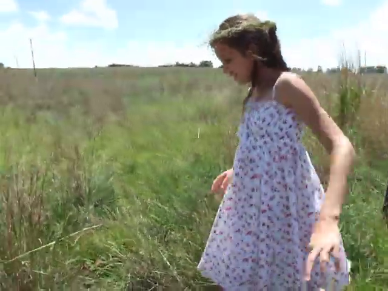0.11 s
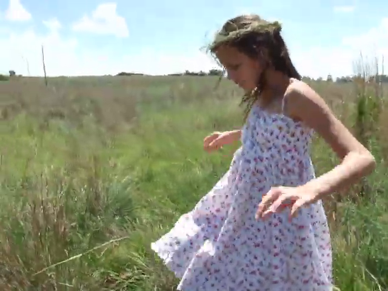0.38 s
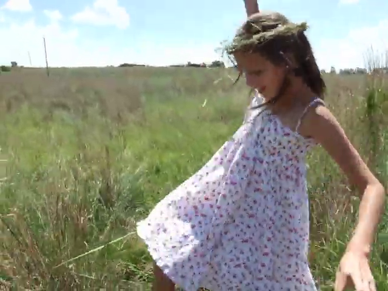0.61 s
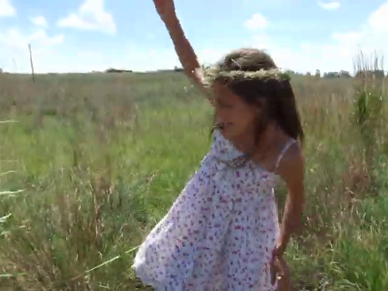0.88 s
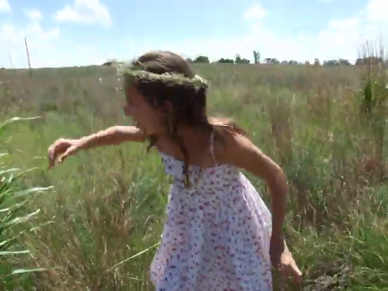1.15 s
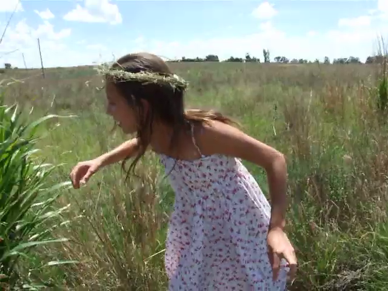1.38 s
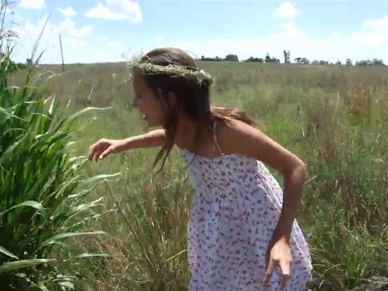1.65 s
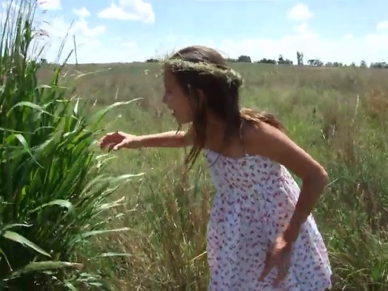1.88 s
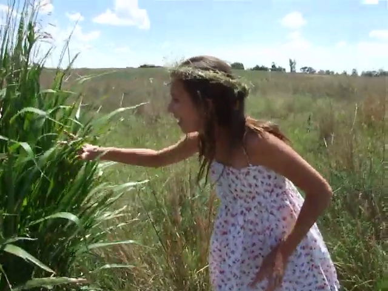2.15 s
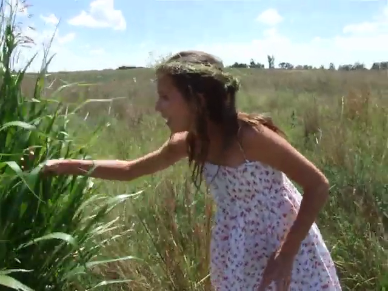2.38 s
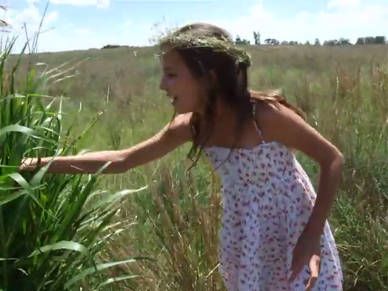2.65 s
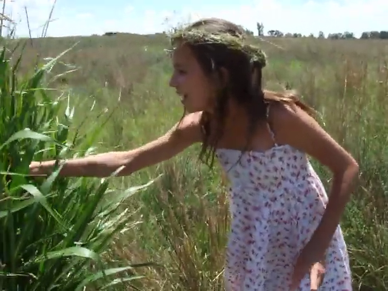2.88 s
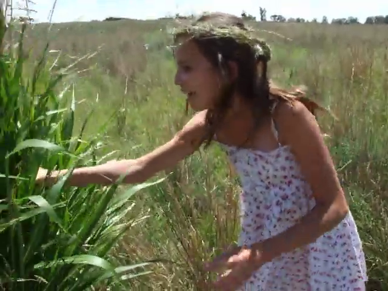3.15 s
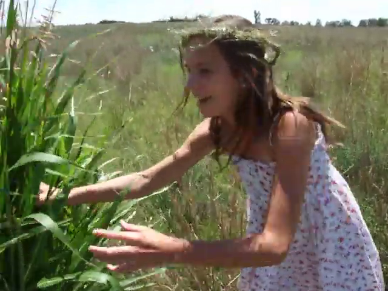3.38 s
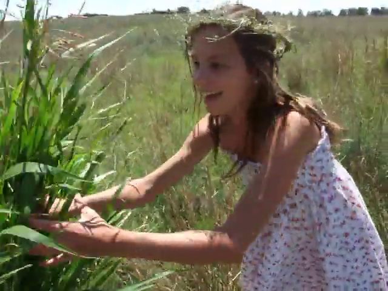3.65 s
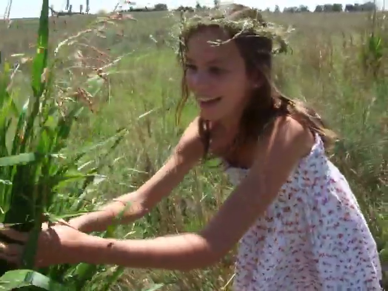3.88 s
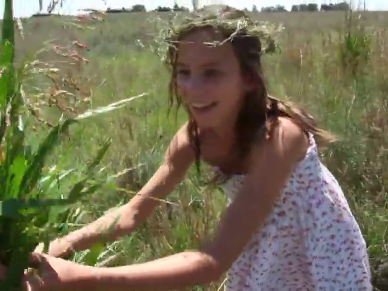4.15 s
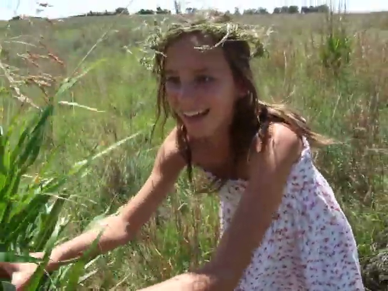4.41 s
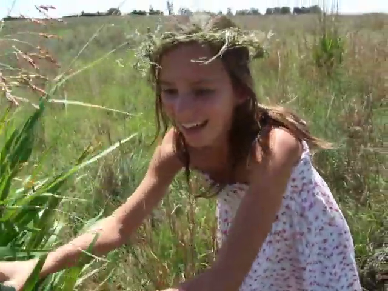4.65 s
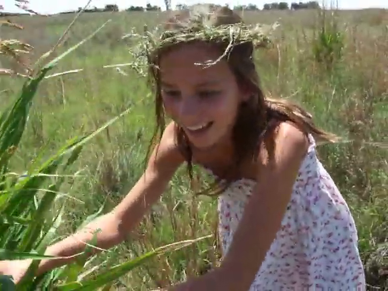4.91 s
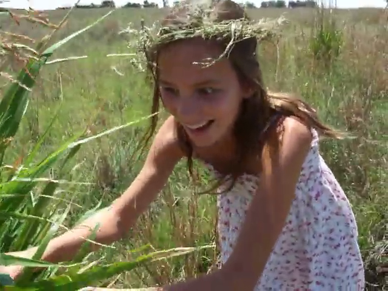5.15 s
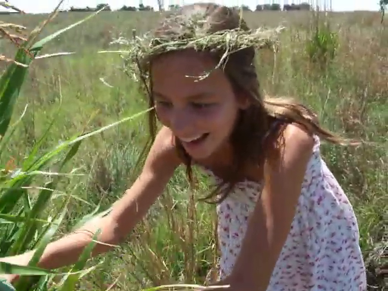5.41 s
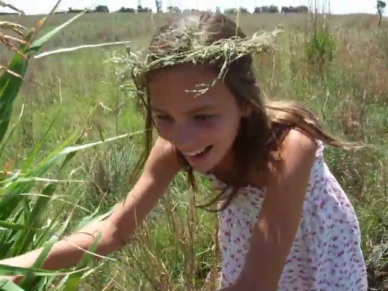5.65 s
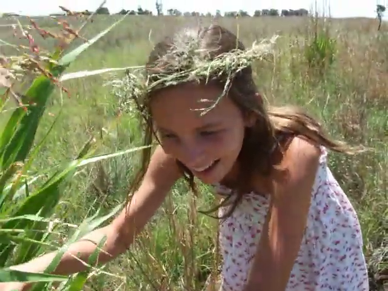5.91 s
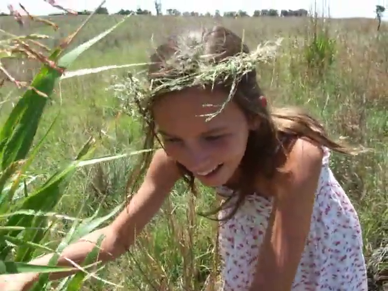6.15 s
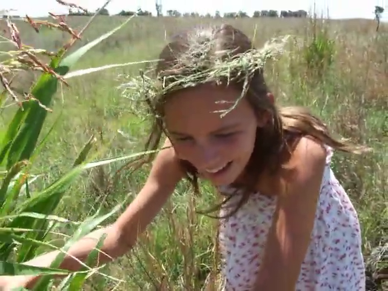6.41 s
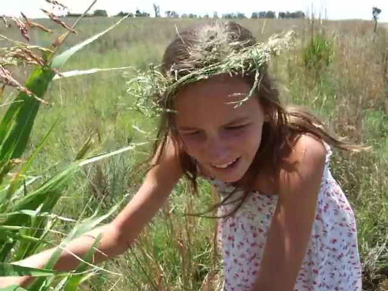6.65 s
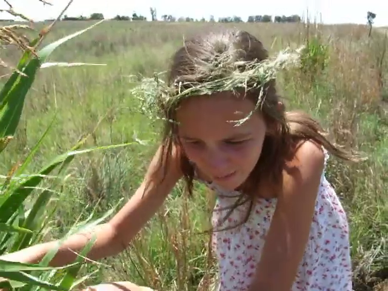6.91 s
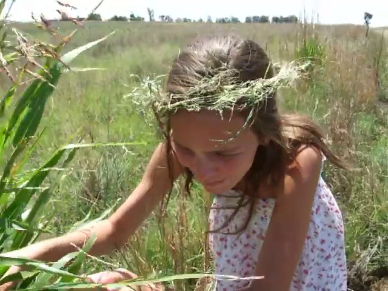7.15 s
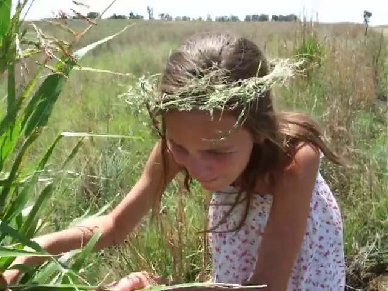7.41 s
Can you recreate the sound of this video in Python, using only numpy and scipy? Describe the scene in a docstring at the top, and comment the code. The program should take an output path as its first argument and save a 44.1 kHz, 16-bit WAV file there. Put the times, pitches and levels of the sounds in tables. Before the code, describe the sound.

Dry tall grass rustles and crackles close by as someone brushes through and handles it, stems snapping, one stalk breaking sharply near the end.

```python
"""Tall dry grass rustles close by as someone wades through a field and pulls at the stalks.
Leaves brush and crackle in grains of noise; stems snap as short cracks, rings and knocks; one thick stalk breaks loudly
as a cluster of fading tones. Faint small ticks, perhaps a camera's autofocus motor, sound on two tones, and a thin
falling whistle chirps once. Light wind puffs push slow bumps onto the microphone, over a steady hiss of filtered noise."""
import sys
import numpy as np
from scipy import signal
from scipy.fft import rfft, irfft, next_fast_len
from scipy.io import wavfile
from scipy.ndimage import map_coordinates

SR = 44100
rng = np.random.default_rng(int(sys.argv[2]) if len(sys.argv) > 2 else 0)


def natural_amplitude(level_db):
    """Convert a level in decibels to a linear amplitude factor, elementwise."""
    exponent = np.asarray(level_db, float) / 20
    return 10 ** exponent


def generate_wav(signal):
    """Clip the signal to [-1, 1] and save it as 16-bit WAV at the path in sys.argv[1]."""
    frames = np.transpose(np.atleast_2d(signal))
    scaled = np.clip(frames, -1, 1) * 32767
    pcm = np.round(scaled).astype(np.int16)
    wavfile.write(sys.argv[1], SR, pcm)


N = 332514  # length in samples

# Colour of the steady hiss. Each row: frequency in Hz, relative level in dB per Hz.
HISS_COLOUR = [(15, -56), (25, -8.5), (60, -2.5), (220, -11.5), (420, -13.5), (650, -14), (1000, -15),
               (2300, -15), (4000, -17), (7500, -22), (12000, -19.5)]
HISS_DB = -52

# Wind puffs on the microphone. Each row: start in seconds, relative level in dB, time scale of the rise in seconds.
WIND_PUFFS = [(1.962, -35, 0.0026), (3.27, -54, 0.0081), (3.58, -28, 0.0027), (3.6, -31, 0.0023)]

# The one chirp: start in seconds, peak level in dB, start pitch in Hz, end pitch in Hz, length in seconds.
CHIRP_NOTE = (5.243, -49, 4150, 3900, .028)

# Faint small ticks. Each row: start in seconds, relative level in dB.
SMALL_TICKS = [(1.5594, -37), (2.7931, -38), (2.822, -44), (2.8548, -32), (2.8873, -38), (4.831, -42),
               (4.8863, -34.5), (4.904, -37.5), (4.9337, -37), (4.9596, -41), (4.9891, -44), (5.021, -34),
               (5.0535, -38), (6.3034, -42), (6.4966, -42.5), (6.6558, -37), (6.6872, -39), (7.2544, -39),
               (7.351, -39)]
LOW_RING_DB, LOW_RING_SCATTER_DB = -55.5, 2  # the ticks' low tone, and how much its level varies

# Drags of straw on the legs. Each row: middle in seconds, half length in seconds, level in dB.
STRIDE_DRAGS = [(0.264, 0.16, -47.5), (.9, 0.43, -56)]
# Colour of dry, papery straw. Each row: frequency in Hz, relative level in dB per Hz.
PAPERY_COLOUR = [(1500, -40), (2500, -8), (3100, 0), (3700, -5), (5000, -35)]

# Tones of the breaking stalk. Each row: pitch in Hz, level in dB relative to the break,
# time to fall by 60 dB in seconds.
STALK_TONES = [(640, -20, .025), (1500, -7, .017), (2650, -15, .012), (3200, -14, .016), (3950, -8, .011),
               (4660, -10, .009), (5500, -2, .006), (6750, 12, .0028), (7500, -19, .05)]
BREAK_S, BREAK_DB = 6.7084, -14  # start in seconds, level that scales the whole break
SETTLE_DB, SETTLE_T60 = -28, 0.16  # torn sheath: dB relative to the break, seconds to fall by 60 dB

# The loudest snaps. Each row: time in seconds, crack level in dB, stem level in dB, stem pitch in Hz, knock level in dB.
LOUD_SNAPS = [(0.113, -26, -30, 4480, -60), (0.1544, -30, -36, 1660, -43), (.1893, -26, -29.5, 3080, -54),
              (.205, -25, -32, 2450, -52), (0.2334, -22, -20, 3940, -43), (.3043, -19, -33, 4260, -60),
              (0.308, -21, -26, 4480, -55), (0.3175, -9, -19, 3120, -42), (0.3424, -25, -26.5, 2240, -43),
              (.526, -52, -35, 1600, -57), (.6216, -26, -44, 3190, -60), (0.69, -36, -34, 3080, -62),
              (0.7338, -27, -30, 3490, -63), (0.8194, -17.5, -43, 4290, -62), (0.882, -17, -41, 3010, -57),
              (0.8928, -12.5, -44, 4480, -56), (0.901, -21, -28, 3000, -34.5),
              (0.9279, -15.5, -38, 4110, -47), (0.9439, -10, -28, 2260, -52),
              (0.9637, -14.5, -37, 3660, -56), (.9733, -23, -34, 2500, -64), (1.032, -19, -45, 4480, -53),
              (1.0604, -22, -37, 4460, -65), (1.084, -13, -27, 3530, -42), (1.088, -21.5, -45, 4480, -54),
              (1.121, -32, -31, 2970, -50), (1.184, -28, -29.5, 3170, -52), (1.196, -22, -36, 3570, -64),
              (1.21, -27, -61, 1420, -56), (1.2176, -21, -26.5, 2930, -40), (1.435, -28.5, -31, 3810, -55),
              (1.5107, -18, -30, 3360, -36.5), (1.6009, -23, -28, 3810, -39),
              (1.7292, -41, -34.5, 3040, -52), (2.0718, -27, -38, 4480, -55), (2.083, -40, -40, 2500, -44),
              (2.21, -40, -35, 1500, -46), (2.3107, -23, -42, 4480, -63), (2.4698, -21, -50, 4480, -60),
              (3.174, -16, -38, 4130, -63), (3.1962, -13.5, -27, 4480, -60), (3.285, -34, -31, 1500, -44),
              (3.542, -15.5, -41, 4480, -60), (3.8558, -17, -27, 3900, -53), (4.262, -26, -31, 1800, -47),
              (4.3207, -18.5, -40, 4480, -60), (4.4322, -19.5, -28.5, 3060, -44),
              (4.535, -23, -33, 4410, -56), (4.546, -26, -31, 2760, -54), (4.6906, -26, -36, 4480, -45),
              (5.0253, -29, -36, 2610, -50), (5.2386, -18.5, -38, 4200, -62),
              (5.4454, -24.5, -49, 4480, -53), (5.4974, -28, -31.5, 3140, -51),
              (5.5389, -22, -52, 4480, -58), (5.5667, -24.5, -49, 4480, -60), (5.6674, -25, -46, 4480, -60),
              (5.913, -40, -32, 4300, -65), (6.14, -29, -40, 3270, -59), (6.154, -33, -40, 2540, -60),
              (6.208, -32, -50, 4480, -58), (6.436, -29, -46, 4480, -60), (6.7876, -22, -35, 4480, -60),
              (6.827, -27, -44, 4480, -60), (6.9742, -22.5, -50, 4480, -64), (6.9838, -23, -50, 3770, -65),
              (7.0729, -22, -40, 4480, -47), (7.5157, -25, -60, 4480, -60)]
CRACK_HZ, CRACK_SCATTER = 6950, .06  # usual pitch of a crack, and the share by which it varies
SMALL_SNAPS = 30  # how many lesser snaps
SMALL_DB = 11.5  # their usual crack level, in dB over the blades
SMALL_STEM_DB, SMALL_KNOCK_DB = -12.5, -34.5  # stem (on average) and knock, in dB relative to the crack
SMALL_STEM_HZ = 3770  # usual stem pitch

# How strongly the grass is brushed. Each row: time in seconds, thin blades in dB, broad leaves in dB.
BRUSH_LEVELS = [(0, -43.5, -50), (.2, -36.5, -48.5), (.38, -40, -50.5), (.53, -53, -65.5), (.63, -44, -58),
                (.82, -41.5, -55), (.92, -34, -47), (1.08, -41.5, -56.5), (1.3, -47, -57),
                (1.62, -46.5, -53.5), (1.88, -49.5, -59), (1.98, -44.5, -51.5), (2.07, -37.5, -44.5),
                (2.149, -45.5, -54), (2.289, -37, -48), (2.43, -43.5, -54), (2.6, -41, -52.5),
                (2.721, -36, -50), (3.04, -40.5, -54.5), (3.271, -29, -40), (3.441, -39.5, -52),
                (3.59, -30, -49.5), (3.72, -34.5, -45.5), (3.87, -30.5, -45.5), (3.99, -37, -49.5),
                (4.17, -27, -43.5), (4.3, -33.5, -45.5), (4.41, -41, -50), (4.51, -42.5, -52),
                (4.77, -47.5, -57.5), (4.87, -44, -53), (4.97, -48.5, -53), (5.12, -43, -58.5),
                (5.27, -51, -60.5), (5.57, -44.5, -58), (5.76, -47.5, -60), (5.86, -50, -60),
                (6.3, -55.5, -57), (6.68, -53, -60), (6.779, -40.5, -57.5), (7.0, -41.5, -56.5),
                (7.139, -47, -59), (7.289, -45, -57.5), (7.4, -47, -58.5), (7.54, -42, -55.5)]
# Quick rubs that lift the blades. Each row: middle in seconds, added level in dB.
QUICK_RUBS = [(.74, -40), (.816, -47), (1.03, -39), (1.513, -43), (1.604, -32.5), (2.073, -41),
              (3.199, -37), (4.324, -42), (4.531, -38), (4.697, -40.5), (5.023, -42), (5.241, -39.5),
              (5.445, -44), (5.664, -44), (5.912, -47), (6.942, -37), (6.972, -38), (7.072, -36),
              (7.516, -45)]
RUB_S = 0.0053  # half length of a rub in seconds
# Colour of the thin blades. Each row: frequency in Hz, relative level in dB per Hz.
BLADE_COLOUR = [(1800, -42), (3000, -29.5), (4500, -9), (6000, -1), (7200, 1.5), (8000, -0.4), (9000, -8.5),
                (12000, -11.5)]
# Colour of the broad leaves. Each row: frequency in Hz, relative level in dB per Hz.
LEAF_COLOUR = [(600, -33.5), (1400, -6.5), (2200, -2.5), (3100, -2.5), (4300, -1), (6500, -9),
               (9000, -66.5)]
# Colour of the heavy stems. Each row: frequency in Hz, relative level in dB per Hz.
STEM_COLOUR = [(150, -37.5), (300, 0), (600, -0.5), (1100, -2.5), (1600, -4.5), (3000, -42)]
# Heavy stems: base level in dB, dB of change per dB of the leaves, size of their own slow drift in dB.
STEMS_DB, STEMS_FOLLOW, STEMS_WANDER_DB = -61, 0.52, 2

# Low-pass edge: the treble falls away steeply above 8 kHz. Each row: frequency in Hz, level in dB.
TREBLE_EDGE = [(10, -0.5), (7700, 0), (8200, -4), (8600, -12), (8900, -22.5), (9200, -48), (9500, -87),
               (12000, -120)]
OFFSET = -.0026  # constant shift of the wave, full scale = 1


def along(points, hz):
    """Read a curve of (Hz, value) points, with frequency on a log scale."""
    point_hz, value = np.transpose(points)
    return np.interp(np.log(hz + 1), np.log(point_hz + 1), value)


def unit(x):
    """Scale a sound to an rms of 1."""
    return x / np.sqrt(np.mean(x ** 2) + 1e-20)


def coloured(x, spectrum):
    """Filter x to the given spectrum, with no sound ahead of its cause."""
    m = 2 * next_fast_len(N // 2 + 4096)
    gain = natural_amplitude(along(spectrum, np.fft.rfftfreq(m, 1 / SR)))
    # folding the cepstrum gives the filter that answers soonest (minimum phase)
    cepstrum = irfft(np.log(gain + 1e-6), m)
    cepstrum[1:m // 2] *= 2
    cepstrum[m // 2 + 1:] = 0
    response = np.exp(rfft(cepstrum))
    return irfft(rfft(x, m) * response, m)[:N]


def wobble(rate):
    """A smooth random curve with the given number of random points a second."""
    points = rng.standard_normal(int(N * rate / SR) + 4)
    return map_coordinates(points, [np.arange(N) * rate / SR])


def ring(hz, t60, t, attack):
    """A struck part rings as a fading sine with a soft start; t60 is the time to fall by 60 dB."""
    return np.sin(2 * np.pi * hz * t) * natural_amplitude(-60 * t / t60) * (1 - np.exp(-t / attack))


def blip(hz, life, noisy, t):
    """A short burst swells to its peak at time life and dies away, part tone, part noise."""
    u = t / life
    bright_noise = np.diff(rng.standard_normal(len(t) + 1))
    wave = np.sin(2 * np.pi * (hz * t + rng.random())) + noisy * bright_noise
    return u * np.exp(1 - u) * wave


def add(track, s, sound):
    """Mix a sound into the track from time s on."""
    part = track[round(s * SR):][:len(sound)]
    part += sound[:len(part)]


def crackle(spectrum, rate, spread_db, life, smooth_db, clump_db):
    """Tiny contacts of very unequal size, each a puff of noise, over the smooth slide of leaf on leaf."""
    hit = rng.random(N) < rate / SR  # rate is in contacts a second
    sizes = hit * natural_amplitude(spread_db * np.minimum(rng.exponential(size=N), 3.2))
    fade = np.exp(-np.arange(800) / SR / life)
    grains = unit(signal.fftconvolve(sizes, fade)[:N] * rng.standard_normal(N))
    slide = natural_amplitude(smooth_db) * rng.standard_normal(N)
    clumps = natural_amplitude(clump_db * (0.27 * wobble(18) + 1.19 * wobble(70)))  # contacts come in bunches
    return unit(coloured(clumps * (grains + slide), spectrum))


def hiss():
    """Far grass, air and the microphone's own noise blend into a nearly steady hiss."""
    level = natural_amplitude(HISS_DB + 0.27 * wobble(6.4))
    return level * unit(coloured(rng.standard_normal(N), HISS_COLOUR))


def puffs():
    """Wind pushes the microphone's diaphragm out; it swings back slowly."""
    out = np.zeros(N)
    for s, db, rise in WIND_PUFFS:
        u = np.arange(SR // 10) / SR / rise
        push = u ** 2 * (1 - u / 3) * np.exp(-u)  # turns negative on the way back
        add(out, s, natural_amplitude(db) * push)
    return out


def chirp():
    """One thin whistle falls in pitch, quickly at first, and swells and fades once."""
    s, db, start_hz, end_hz, length = CHIRP_NOTE
    out = np.zeros(N)
    u = np.arange(int(length * SR)) / SR / length
    hz = end_hz + (start_hz - end_hz) * (1 - u) ** 2
    whistle = np.sin(2 * np.pi * np.cumsum(hz) / SR)
    add(out, s, natural_amplitude(db) * np.sin(np.pi * u) * whistle)
    return out


def ticks():
    """Faint small ticks, perhaps a camera's autofocus motor, on a 2.4 kHz and a 620 Hz tone."""
    out = np.zeros(N)
    t = np.arange(SR // 20) / SR
    for s, db in SMALL_TICKS:
        low_db = LOW_RING_DB + LOW_RING_SCATTER_DB * rng.standard_normal()
        high = natural_amplitude(db) * .6 * blip(2400, life=.001, noisy=.5, t=t)
        low = natural_amplitude(low_db) * ring(620, t60=.05, t=t, attack=.002)
        add(out, s, high + low)
    return out


def wading():
    """Dry straw dragged against the legs has a papery ring, once per stride."""
    t = np.arange(N) / SR
    drag = sum(natural_amplitude(db) * np.exp(-((t - s) / half) ** 4) for s, half, db in STRIDE_DRAGS)
    return drag * crackle(PAPERY_COLOUR, rate=190, spread_db=4.0, life=0.00089, smooth_db=5.0, clump_db=2.0)


def stalk():
    """A thick hollow stalk breaks and rings briefly; splinters and the papery sheath settle after it."""
    out = np.zeros(N)
    t = np.arange(SR // 8) / SR
    tones = sum(natural_amplitude(db) * ring(hz, t60, t, attack=0.000067) for hz, db, t60 in STALK_TONES)
    # splinters: a strong quick burst and a weaker, slower tail
    splinters = rng.standard_normal(len(t)) * (natural_amplitude(-11 - 60 * t / .045) + natural_amplitude(-27 - 60 * t / .2))
    band = signal.butter(N=1, Wn=[1500, 8000], btype="band", fs=SR, output="sos")
    splinters = signal.sosfilt(band, splinters)
    papery = unit(coloured(rng.standard_normal(N), PAPERY_COLOUR))[:len(t)]
    sheath = natural_amplitude(SETTLE_DB - 60 * t / SETTLE_T60) * papery
    add(out, BREAK_S, natural_amplitude(BREAK_DB) * (tones + splinters + sheath))
    return out


def small_snaps():
    """Lesser snaps at chance times, their strength following the brushing around them."""
    s, blades_db, _ = np.transpose(BRUSH_LEVELS)
    at = rng.uniform(.001, N / SR, SMALL_SNAPS)
    luck = rng.standard_normal((SMALL_SNAPS, 3))
    crack_db = np.interp(at, s, blades_db) + SMALL_DB + 1.6 * luck[:, 0]
    stem_db = crack_db + SMALL_STEM_DB + 5 * luck[:, 1]
    stem_hz = SMALL_STEM_HZ * natural_amplitude(1.5 * luck[:, 2])
    knock_db = crack_db + SMALL_KNOCK_DB
    return list(zip(at, crack_db, stem_db, stem_hz, knock_db))


def snaps():
    """Each snap: a crisp crack with a frayed tail, a short ring of the stem and a dull knock."""
    out = np.zeros(N)
    t = np.arange(SR // 50) / SR
    for s, crack_db, stem_db, stem_hz, knock_db in list(LOUD_SNAPS) + small_snaps():
        crack_hz = CRACK_HZ * (1 + CRACK_SCATTER * np.clip(rng.standard_normal(), -2, 2))
        fray = 0.26 * np.diff(rng.standard_normal(len(t) + 1)) * natural_amplitude(-60 * t / 0.037)
        crack = natural_amplitude(crack_db) * (blip(crack_hz, life=.00022, noisy=.2, t=t) + fray)
        stem = natural_amplitude(stem_db) * blip(stem_hz, life=.00022, noisy=.05, t=t)
        knock_hz = 700 * natural_amplitude(1.9 * rng.standard_normal())
        knock = natural_amplitude(knock_db) * blip(knock_hz, life=0.0008, noisy=0, t=t)
        add(out, s - .0004, crack + stem + knock)  # starts just ahead of its listed time
    return out


def brush():
    """Thin blades fizz in the treble, broad leaves scrape lower, heavy stems rub dully along with the leaves."""
    s, blades_db, leaves_db = np.transpose(BRUSH_LEVELS)
    t = np.arange(N) / SR
    swell = natural_amplitude(np.interp(t, s, blades_db))
    rub = np.exp(-((t[:SR // 20] - .02) / RUB_S) ** 2)  # peaks 0.02 s in
    for at, db in QUICK_RUBS:  # a quick rub lifts the blades for a moment
        add(swell, at - .02, natural_amplitude(db) * rub)
    leaves_db = np.interp(t, s, leaves_db)
    follow_db = STEMS_FOLLOW * (leaves_db - leaves_db.mean())
    stems_db = STEMS_DB + follow_db + STEMS_WANDER_DB * wobble(7.3)
    blades = crackle(BLADE_COLOUR, rate=510, spread_db=10.0, life=0.0018, smooth_db=4.0, clump_db=0.9)
    leaves = crackle(LEAF_COLOUR, rate=350, spread_db=4.5, life=0.0016, smooth_db=2.5, clump_db=0.9)
    stems = crackle(STEM_COLOUR, rate=120, spread_db=3.5, life=0.0014, smooth_db=6, clump_db=1.7)
    return swell * blades + natural_amplitude(leaves_db) * leaves + natural_amplitude(stems_db) * stems


def scene():
    """Everything reaches one microphone."""
    background = hiss() + puffs() + chirp() + ticks()
    grass = wading() + stalk() + snaps() + brush()
    return (background + grass)[None]  # one channel


def low_pass(x):
    """Removes everything above the highest recorded frequency."""
    return signal.sosfilt(signal.butter(12, 9440, fs=SR, output="sos"), x)


def record(dry):
    """The top of the treble is cut steeply and the wave is shifted by a small constant."""
    softened = coloured(dry[0], TREBLE_EDGE)[None]
    mix = softened + OFFSET
    return low_pass(mix)


dry = scene()
out = record(dry)
generate_wav(out)
```